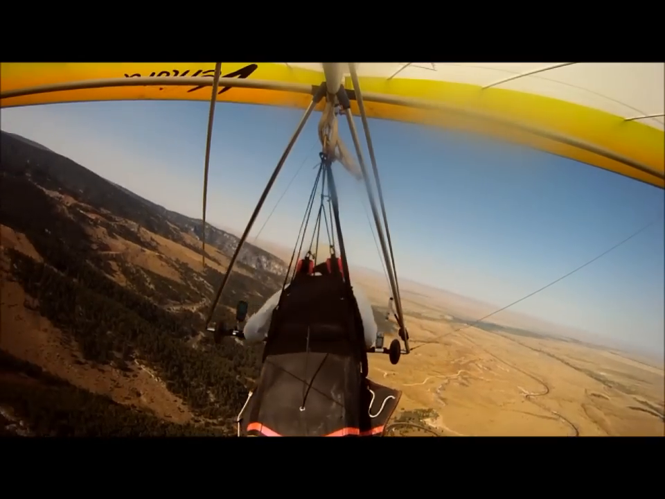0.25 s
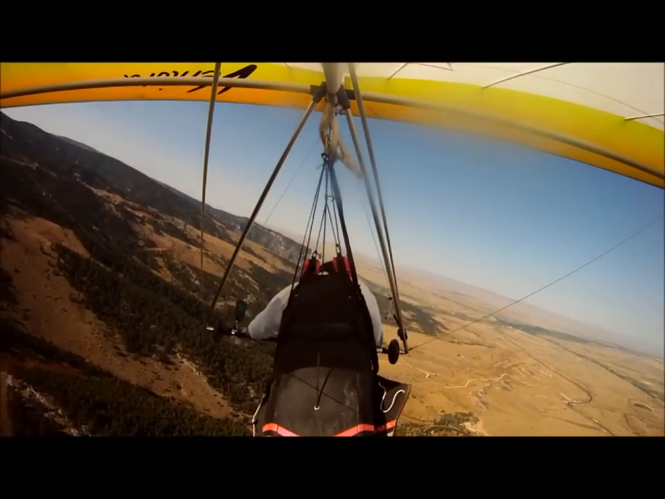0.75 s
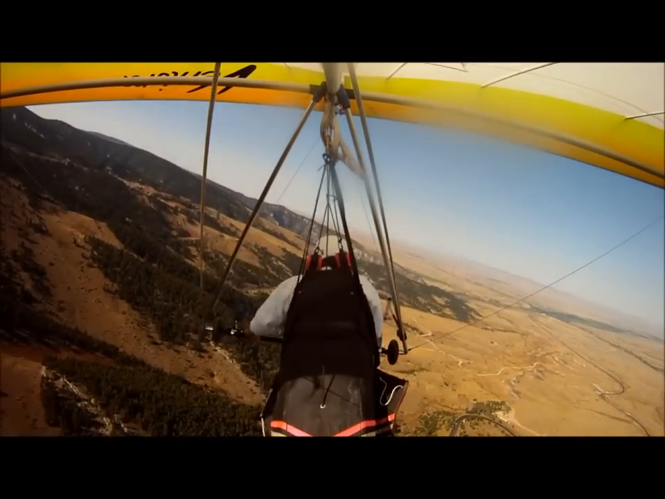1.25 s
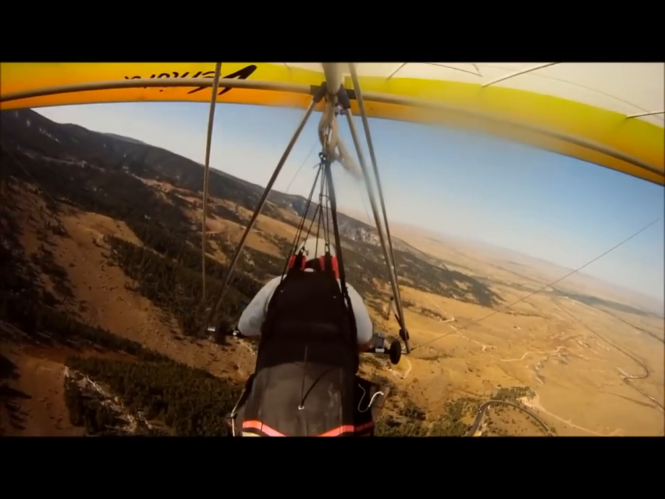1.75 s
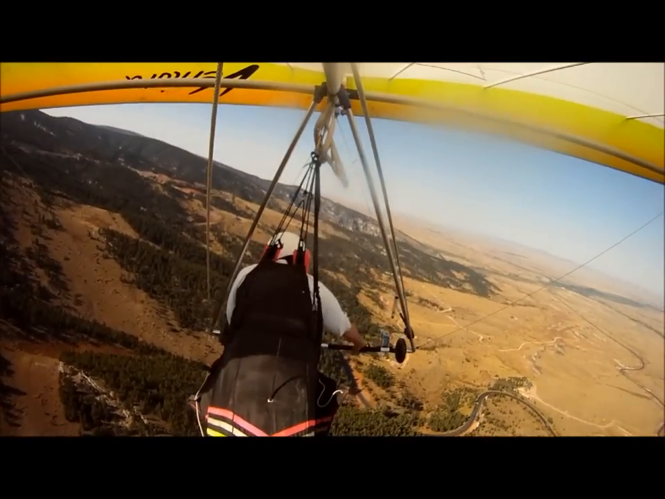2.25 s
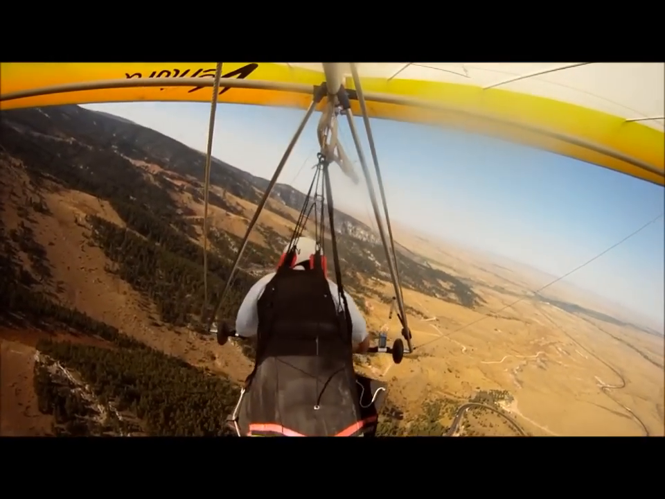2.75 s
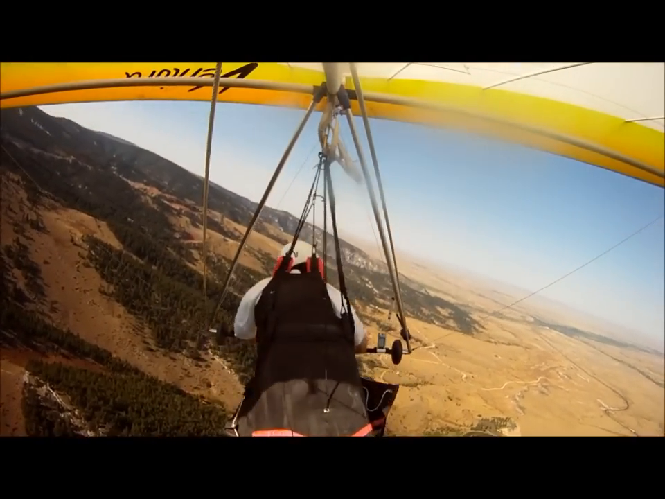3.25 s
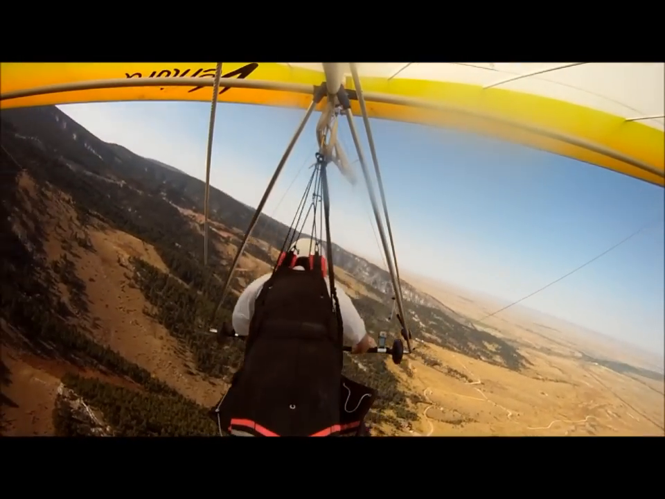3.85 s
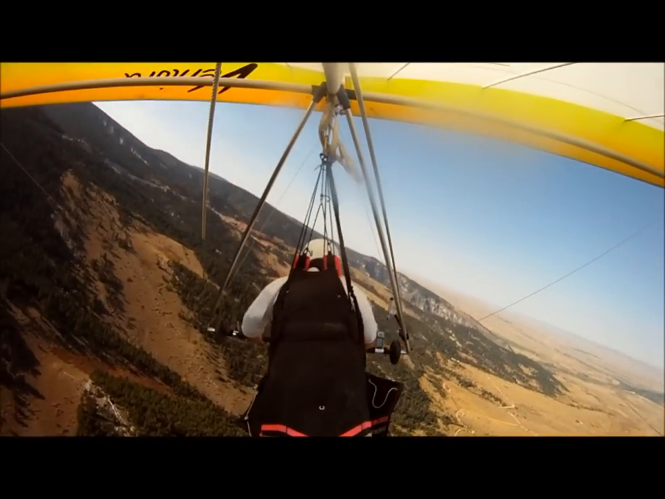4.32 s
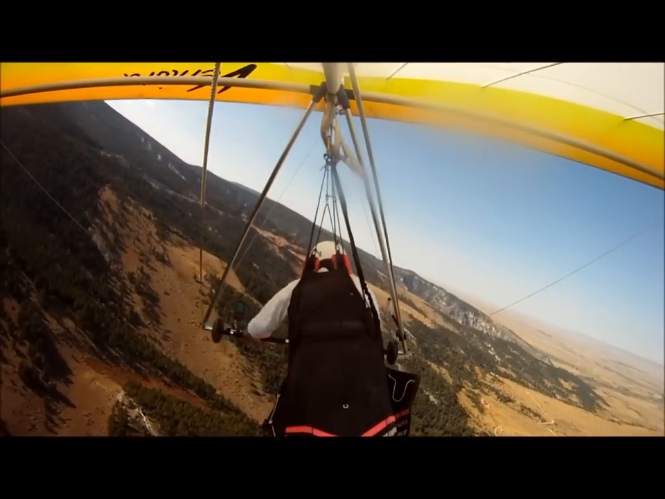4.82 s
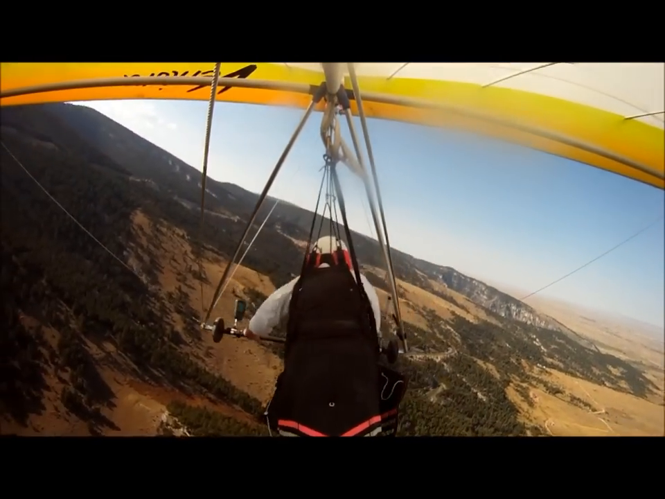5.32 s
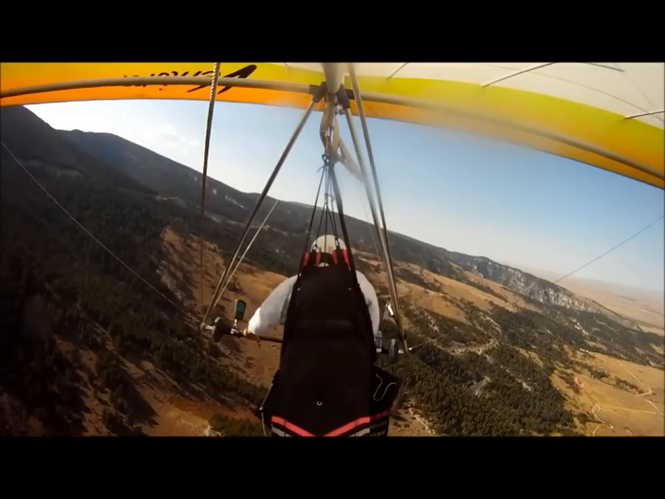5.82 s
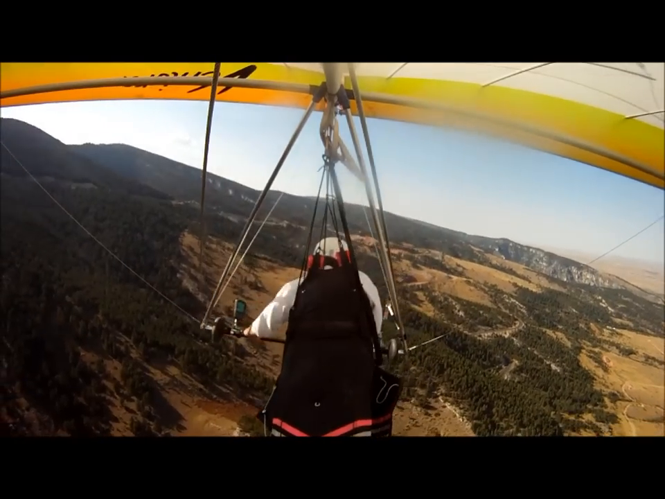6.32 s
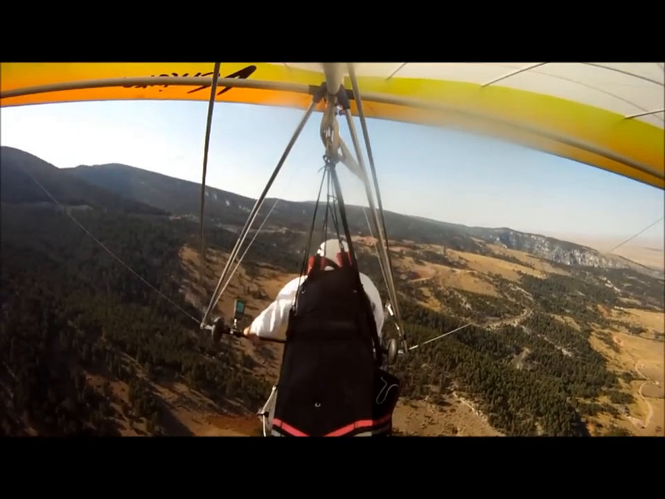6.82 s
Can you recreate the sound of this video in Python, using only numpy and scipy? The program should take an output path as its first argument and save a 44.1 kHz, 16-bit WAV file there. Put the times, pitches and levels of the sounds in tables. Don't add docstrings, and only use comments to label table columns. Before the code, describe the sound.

Loose plastic camera housing knocks, buzzes and rattles on a hang glider frame while wind hisses past and a low flutter wavers underneath.

```python
import sys
import numpy as np
from scipy import signal
from scipy.fft import rfft, irfft
from scipy.io import wavfile
from scipy.ndimage import uniform_filter1d

SR = 44100
rng = np.random.default_rng(int(sys.argv[2]) if len(sys.argv) > 2 else 0)


def store_pcm(level_fs):
    pcm = np.round(np.clip(level_fs, -1, 1) * 32767).astype(np.int16)
    wavfile.write(sys.argv[1], SR, np.atleast_2d(pcm).T)


def magnitude_from_level(level_db):
    exponent = np.asarray(level_db, float) / 20
    return 10 ** exponent


N = 311787

# pitch in Hz, width in Hz, level in dB.
DOOR_MODES = [(981.6, 76, 3.5), (1126.3, 66, 7)]
SHELL_MODES = [(1895, 16, 9), (1996, 337, 2.4), (2144, 58, 8.6)]
PORT_MODES = [(2397, 254, -1), (2506, 67, 6)]
LATCH_MODES = [(2935, 84, -0.71), (3270, 160, -1.8), (3558, 210, -1)]
CORNER_MODES = [(376, 54, -4.5), (668, 30, -4.5), (526, 72, -16), (758, 70, -6.5), (858, 124, -5.5),
                (1349, 46, -2), (1467, 73, 1), (1746, 77, 1.5), (4020, 110, -16), (5180, 580, -13.5)]
TUBE_MODES = [(87, 9.6, -7), (125.8, 11.2, -3.5), (172, 14.7, -5), (212.6, 16.7, 2), (305.7, 23.4, -16)]

# time in seconds, strength in dB,
# lean toward the neighbouring parts in dB, hardness in dB.
DOOR_KNOCKS = [(0.7287, -14, -1.5, -3), (0.809, -22, -4.5, -1), (0.9522, -21.5, -6.5, -8),
               (1.0819, -31.5, -1, 9), (1.0993, -19.5, -4, -5), (1.3901, -25.5, -10, 5),
               (1.8674, -18, -6, -15), (1.956, -16, -9, -3), (1.9668, -20, -9, 2), (2.0379, -18, -12, 3),
               (2.2479, -20, -4.5, -3), (2.3169, -17.5, -4.5, -6), (2.5412, -24, -2, 6),
               (3.3514, -24, -27, -16), (4.1968, -25, 2.5, 4), (4.4195, -19.5, 0, -2),
               (4.5224, -17.5, -8, 2), (4.576, -21.5, -4, 4), (4.6119, -22, -4, -3), (4.6859, -20, -4, 1),
               (4.8083, -20.5, -9, -5), (4.9923, -11.5, -8.5, -7), (5.1562, -28, -9, 2),
               (5.1715, -25.5, 2, 6), (5.2857, -21, -13, -4), (6.3933, -18.5, -6, -4),
               (6.4708, -25.5, 2.5, -3), (6.56, -18, -8, -6), (6.6654, -21, -10, 0), (6.9371, -27, -9, -1),
               (1.895, -21, -6, -7), (0.934, -29, -8, 3), (1.0165, -22, -2.5, -3), (4.4815, -19, -3.5, -2),
               (2.029, -28, -15, -13), (0.7345, -18.5, -6, -5)]
SHELL_KNOCKS = [(0.0463, -23.5, 2, -5.5), (1.9830, -29, -6, 7), (2.1375, -23.5, -15, -3),
                (2.1804, -21.5, -6, -0.5), (2.1954, -21, -9, -4), (2.2897, -19, -1, -3.5),
                (2.6718, -28, -16, 2), (2.7344, -19, -22, -3), (2.7711, -24, -17, -7),
                (2.8035, -14.5, -3, -6.5), (2.8164, -21, -22, -3), (2.8644, -21, -8, -9),
                (3.0824, -22, -27, -4), (3.1078, -45, -25, -7), (3.1467, -26, 2, -18),
                (3.1727, -20, -38, -9), (3.6194, -7, -15.5, -5.5), (3.7184, -29, -15, -6),
                (3.7474, -13, -9, -9.5), (3.8786, -16.5, -3, -12), (4.2408, -27, -24, -1),
                (4.3146, -21, -31, -9), (4.4987, -10, -21, -9), (4.8554, -17.5, -16, -5.5),
                (5.0963, -29, -31, -6), (5.5169, -25.5, -22, -1), (6.3061, -16.5, -9, -5.5),
                (6.7052, -28, -31, -7), (6.8463, -16.5, -5, -5.5), (7.007, -24.5, -22, 6)]
HINGE_KNOCKS = [(0.19, -27.5, 6, -13), (0.342, -33, 8, -10), (0.794, -28, 1, -2), (0.9982, -21, 10.5, -7),
                (1.1274, -25, 10.5, -3), (1.2265, -23.5, 4, -1.5), (1.934, -18, -12, 3),
                (1.9942, -16, -6.5, 5.5), (2.0079, -17, -8, -3), (2.0596, -27, 10, -11),
                (2.167, -18.5, 5, -5), (2.2176, -11.5, -2, -6), (2.9507, -20.5, 5, -13),
                (3.2571, -17.5, -8, -3), (3.2705, -16.5, -2.5, -6), (3.2981, -24, -8, 0),
                (3.4501, -12.5, 4, -9), (3.5749, -24, 15, -16), (4.4585, -16.5, -3, 5),
                (4.4823, -26, 6, -1), (4.5597, -12.5, 4.5, -9.5), (4.8911, -29, -10, -6),
                (4.9075, -10.5, -2.5, -3), (4.9417, -12, 0, -15), (5.5457, -46, 0, -1),
                (5.7662, -26.5, 0, 0), (6.5877, -28, 6, -6), (6.6235, -18.5, 5, -8)]
LATCH_KNOCKS = [(1.9435, -26, -3, -1), (1.9545, -18.5, -4, 2), (1.9695, -13, -3, -3), (1.9845, -26, -3, 3),
                (1.9955, -28, -6, -3), (2.0075, -21, -6, 0), (2.029, -16.5, 0, -5), (2.1375, -37, -6, -6),
                (2.2475, -12, -5, -5), (4.4975, -44, -6, -3), (4.5215, -26, 0, -3), (4.76, -30, -6, 7),
                (5.043, -33, 3.5, -3), (6.8465, -29.5, 2, 5), (4.648, -36, 5, -6), (4.8105, -27, -3, -2),
                (2.168, -18, -10, 1), (2.1975, -16, -3, 2), (2.22, -18, -10, 1), (6.307, -32, -3.5, -12),
                (5.172, -25, 7, -13), (4.198, -28.5, 9, -3)]
# start in seconds, length in seconds, strength in dB,
# lean from lens port toward shell in dB.
BUZZES = [(0.727, 0.054, -39, 3), (0.948, 0.034, -36, -2), (1.016, 0.028, -36.5, -8),
          (1.847, 0.071, -35, -2), (1.924, 0.049, -35.5, 14), (1.992, 0.083, -34, -8),
          (2.285, 0.059, -31.5, 3), (2.53, 0.037, -32, -3.5), (3.292, 0.046, -34, 11.5),
          (3.434, 0.0093, -42, 12), (4.42, 0.008, -33, 3), (4.525, 0.05, -34.5, -8),
          (4.577, 0.028, -35.5, 2), (4.643, 0.0204, -36.5, 6), (4.882, 0.02, -35, 8),
          (4.912, 0.057, -35.5, 10), (4.99, 0.024, -31.5, 10.5), (5.165, 0.01, -37, -13),
          (6.347, 0.022, -35.5, -10), (6.388, 0.033, -39, -15), (6.468, 0.04, -32, -10),
          (6.506, 0.055, -33.5, -9)]

DOOR_DRIVE_DB = [-4.5, -1.5, -15, 2, -7]
SHELL_DRIVE_DB = [-1.5, -3.5, 2, -5.5, 1.5]
HINGE_DRIVE_DB = [-2.5, -2, -1, -10, -7.5]
LATCH_DRIVE_DB = [-10.5, 1, 5, -18, -3.2]
BUZZ_DRIVE_DB = [-2, 2.05, -8.5, -3, -7.5]
DOOR_LEAN = [0.33, .01, .01, 1, 0.77]
SHELL_LEAN = [0.34, 0.51, .01, 0.23, 0.31]
HINGE_LEAN = [0.64, .01, 0.62, .1, 0.34]
LATCH_LEAN = [0.54, 0.99, 1, 0.62, .01]
BUZZ_LEAN = [0.31, 0.0096, 0.64, -0.31, -0.024]
HARDNESS_SHARE = [0.63, .01, 0.13, 0.11, 0.68]

# time in seconds, pitch in Hz.
SWAY_PITCH = [
    (0.0, 25.3),
    (2.58, 24.9),
    (2.68, 27.7),
    (4.17, 25.96),
    (4.33, 31.2),
    (4.98, 24.98),
    (7.07, 25.3),
]
# time in seconds, level in dB.
SWING = [(0.0, -35), (.4, -39), (1.0, -35.5), (1.15, -29.5), (1.75, -30), (1.92, -42), (2.0, -25.5),
         (2.44, -22.5), (2.74, -43), (3.0, -33), (3.56, -24.5), (4.33, -38), (4.4, -29.5), (4.62, -40),
         (5.4, -26.5), (5.8, -32), (6.6, -32), (7.0, -23.5)]
# time in seconds, change in dB.
LULLS = [(.33, -2), (.76, 3), (.96, -3), (2.75, -13), (3.05, -10), (3.21, -11), (3.61, -11), (3.83, -2),
         (4.35, -2), (4.71, 6), (5.77, -12), (6.02, 7), (6.22, -6), (6.36, 3), (6.58, -15), (1.93, 9),
         (4.2, 0), (5.05, 1), (7.07, -12), (1.36, -8), (3.42, -8), (4.82, -2), (.55, -2)]

# time in seconds, airspeed as hiss level in dB, gustiness as rattle level in dB.
WIND = [(0.0, -43, -41), (0.2, -55.5, -55.5), (0.7, -48, -47.5), (1.05, -50.5, -43.5), (1.36, -45.5, -52.5),
        (1.85, -42, -48), (2.27, -44.5, -39), (2.57, -46.5, -45), (2.63, -40.5, -47.5), (3.45, -38.5, -42),
        (4.0, -34.5, -38.5), (4.04, -40.5, -47), (4.57, -43, -40.5), (4.85, -44.5, -44), (5.17, -47, -41.5),
        (5.4, -42.5, -45.5), (6.07, -37, -41.5), (7.07, -40.5, -44)]
# time in seconds, change in dB.
PUFFS = [(.3, 9), (1.15, 2.5), (1.5, 3), (1.78, 0.5), (1.94, -6.5), (2.1, 2), (2.37, 1.5), (2.74, -2.5),
         (2.95, 1.5), (3.2, -1.5), (3.7, -1.5), (4.2, 1), (4.44, 0), (4.75, 1), (4.95, -5.5), (5.27, -4),
         (5.42, 3), (5.7, -0.5), (6.19, 0), (6.49, 0), (6.7, 1), (6.85, 1)]
# time in seconds, rise over the steady hum in dB.
JOLTS = [(.3, 3), (.75, 1), (1.95, 1), (2.24, 6.5), (2.4, 7.5), (2.95, 8.5), (3.1, 7.5), (3.501, 9),
         (3.74, 9), (4.269, 9), (4.43, 3), (4.71, 4.5), (5.6, 4.5), (5.85, 4.5), (6.36, 7.5), (6.95, 2.5)]
# pitch in Hz, level in dB per Hz.
BUFFET_COLOUR = [(7.1, -14), (12, -13), (38, 1.5), (81, -7), (154, -7), (210, -9.5), (265, -17),
                 (355, -15.5), (493, -31), (600, -30.5), (780, -26), (1320, -120)]
# pitch in Hz, level in dB per Hz.
HISS_COLOUR = [(290, -28), (500, -47), (670, -26.5), (890, -15.5), (1140, -10.5), (1470, -11.5),
               (1800, -11), (2010, 0.5), (2450, -10), (2900, -18.5), (3600, -9), (4000, -24.5), (4400, -32),
               (6000, -27)]
# pitch in Hz, width in Hz, change in dB.
HISS_DIPS = [(1290, 51, -15), (1783, 57, -11), (3250, 116, -8), (4370, 90, -1.5), (5690, 280, -12.5)]
# time in seconds, pitch in Hz.
SLOT_PITCH = [
    (0.0, 5140),
    (2.4, 4950),
    (2.9, 5180),
    (4.7, 5226),
    (5.3, 4860),
    (7.07, 4915),
]

SKIRT = 3.64


def evened(x):
    return x / np.sqrt(np.mean(x ** 2) + 1e-20)


def control(rows, column):
    rows = np.vstack(rows)
    return np.interp(np.arange(N) / SR, rows[:, 0], rows[:, column])


def bumps_db(rows, rise_s, fall_s):
    moment, db = np.transpose(rows)[:, :, None]
    t = np.arange(0, N, 64) / SR - moment
    shape = np.exp(-(t / np.where(t < 0, rise_s, fall_s)) ** 2)
    return np.repeat((db * shape).sum(0), 64)[:N]


def wander(seconds):
    size = max(round(seconds * SR), 1)
    smooth = uniform_filter1d(rng.standard_normal(N), size)
    return evened(uniform_filter1d(smooth, size))


def ring(x, modes):
    out = np.zeros(len(x))
    for k, (hz, width, db) in enumerate(modes):
        r = np.exp(-np.pi * width / SR)
        pole = r * np.exp(2j * np.pi * hz / SR)
        out += (-1) ** k * magnitude_from_level(db) * 2 * signal.lfilter([1 - r], [1, -pole], x).real
    return out


def steep(x, modes, wider):
    out = np.zeros(len(x))
    for k, (hz, width, db) in enumerate(modes):
        once = ring(x, [(hz, width, db)])
        out += (-1) ** k * ring(once, [(hz, wider * width, 0)])
    return out


def noise(points, size, patchy_db, dips=()):
    hop, hz = size // 4, np.fft.rfftfreq(size, 1 / SR)
    a, b, patches = rng.standard_normal((N // hop + 8, len(hz), 3)).T
    patches = uniform_filter1d(patches, size=8, axis=0)
    patches = evened(uniform_filter1d(patches, size=10, axis=1))
    f, db = np.transpose(points)
    colour_db = np.interp(np.log(hz + 1), np.log(f + 1), db, left=-90, right=-90)
    for dip_hz, width, dip_db in dips:
        colour_db += dip_db * np.exp(-((hz - dip_hz) / width) ** 2)
    spectra = (a + 1j * b) * magnitude_from_level(colour_db[:, None] + patchy_db * patches)
    return evened(signal.istft(spectra, nperseg=size, noverlap=size - hop)[1][:N])


def knocks(rows, place_db, lean, peak_s):
    t = np.arange(900) / SR
    chatter = rng.standard_normal((len(rows), 5, len(t) + 1))
    drive = np.zeros((5, N + len(t)))
    for (s, db, lean_db, hard_db), grains in zip(rows, chatter):
        u = t / (peak_s * magnitude_from_level(0.44 * grains[:, :1]))
        shape = (u * np.exp(1 - u)) ** 2.0
        z = rfft(grains[:, 1:] * shape)
        burst = irfft(z / abs(z), len(t)) * shape ** 0.3
        burst *= np.linalg.norm(shape, axis=1, keepdims=True) / np.linalg.norm(burst, axis=1, keepdims=True)
        parts_db = db + np.array(place_db) + lean_db * np.array(lean) + hard_db * np.array(HARDNESS_SHARE)
        levels = magnitude_from_level(parts_db - 1.67)[:, None]
        hit = round((s + 0.00091) * SR)
        drive[:, hit:hit + 11] += magnitude_from_level(-2) * levels * np.sign(grains[:, 1:2]) * np.hanning(11)
        at = max(round((s - peak_s - 0.0011) * SR), 0)
        drive[:, at:at + len(t)] += magnitude_from_level(-3.5) * levels * burst
    return drive[:, :N]


def buzzes():
    contacts = evened(rng.standard_normal((5, N)) * magnitude_from_level(0.33 * wander(0.0013)))
    drive = np.zeros((5, N))
    for s, length, db, lean_db in BUZZES:
        at, size = round(s * SR), round(length * SR)
        parts_db = db + np.array(BUZZ_DRIVE_DB) + lean_db * np.array(BUZZ_LEAN)
        shape = signal.windows.tukey(size, 0.35) * magnitude_from_level(np.linspace(1.5, -3, size))
        drive[:, at:at + size] += magnitude_from_level(parts_db)[:, None] * shape
    return drive * contacts


def part_ring(drive, modes):
    click = np.eye(1, 8192)[0]
    return steep(drive, modes, SKIRT) / np.linalg.norm(steep(click, modes, SKIRT))


def housing(drive):
    parts = [CORNER_MODES, DOOR_MODES, SHELL_MODES, PORT_MODES, LATCH_MODES]
    rung = sum(part_ring(d, modes) for d, modes in zip(drive, parts))
    wall = signal.butter(4, 3700, fs=SR, output="sos")
    thud = magnitude_from_level(-5.0) * part_ring(drive[1], TUBE_MODES)
    return thud + signal.sosfilt(wall, rung)


def rattle():
    sizes = magnitude_from_level(2.6 * np.minimum(rng.exponential(1, N), 4))
    ticks = sizes * (rng.random(N) < 1100 / SR) * rng.choice([-1., 1.], N)
    ticks *= magnitude_from_level(2.8 * wander(0.037))
    body = ring(ticks, DOOR_MODES) + magnitude_from_level(-18.0) * ring(ticks, PORT_MODES)
    body += magnitude_from_level(-17.5) * ring(ticks, SHELL_MODES + LATCH_MODES + CORNER_MODES)
    level_db = control(WIND, column=2) + 0.81 * bumps_db(PUFFS, rise_s=0.14, fall_s=0.068) - 3.5
    return magnitude_from_level(level_db) * evened(body)


def sway():
    turns = np.cumsum(control(SWAY_PITCH, column=1) + 0.73 * wander(0.1)) / SR
    level_db = control(SWING, column=1) + bumps_db(LULLS, rise_s=0.044, fall_s=0.049)
    level_db += 1.5 + 2.06 * wander(0.033)
    return np.sqrt(2) * magnitude_from_level(level_db) * np.sin(2 * np.pi * turns)


def airframe():
    gusts_db = 0.34 * (control(WIND, column=2) + 45)
    gusts_db += 1.5 * wander(0.12) + 1.32 * wander(0.016)
    buffet = magnitude_from_level(-36.5 + gusts_db) * noise(BUFFET_COLOUR, size=2048, patchy_db=2.0)
    hum = evened(steep(rng.standard_normal(N), TUBE_MODES, 2.25))
    return buffet + magnitude_from_level(-40 + bumps_db(JOLTS, rise_s=0.073, fall_s=0.043)) * hum


def hiss():
    level_db = control(WIND, column=1) + bumps_db(PUFFS, rise_s=0.14, fall_s=0.068)
    level_db += 2.5 + 2.01 * wander(0.0064)
    return magnitude_from_level(level_db) * noise(HISS_COLOUR, size=1024, patchy_db=0.65, dips=HISS_DIPS)


def slot():
    slow = signal.butter(2, 170, fs=SR, output="sos")
    fuzz = signal.sosfilt(slow, rng.standard_normal((2, N)))
    turns = np.cumsum(control(SLOT_PITCH, column=1)) / SR
    whistle = ((fuzz[0] + 1j * fuzz[1]) * np.exp(2j * np.pi * turns)).real
    level_db = -64 + 1.3 * (control(WIND, column=1) + 40.5)
    return magnitude_from_level(level_db) * evened(whistle)


def scene():
    drive = knocks(DOOR_KNOCKS, DOOR_DRIVE_DB, DOOR_LEAN, peak_s=0.002488)
    drive += knocks(SHELL_KNOCKS, SHELL_DRIVE_DB, SHELL_LEAN, peak_s=0.001718)
    drive += knocks(HINGE_KNOCKS, HINGE_DRIVE_DB, HINGE_LEAN, peak_s=0.002196)
    drive += knocks(LATCH_KNOCKS, LATCH_DRIVE_DB, LATCH_LEAN, peak_s=0.001795)
    drive += buzzes()
    mix = housing(drive) + rattle() + sway() + airframe() + hiss() + slot()
    return mix[None]


def top_cut(x):
    return signal.sosfilt(signal.butter(12, 16000, fs=SR, output="sos"), x)


def record(dry):
    slow_hz, hold = 12000, 4
    slow = signal.resample_poly(dry, slow_hz, SR, axis=1)
    stairs = np.repeat(slow, hold, axis=1)
    held = signal.resample_poly(stairs, SR, hold * slow_hz, axis=1)[:, :N]
    low_pass = signal.firwin(401, 15300, window=("kaiser", 8), fs=SR)
    finished = signal.oaconvolve(held, low_pass[None], "same")
    return top_cut(finished)


dry = scene()
out = record(dry)
store_pcm(out)
```